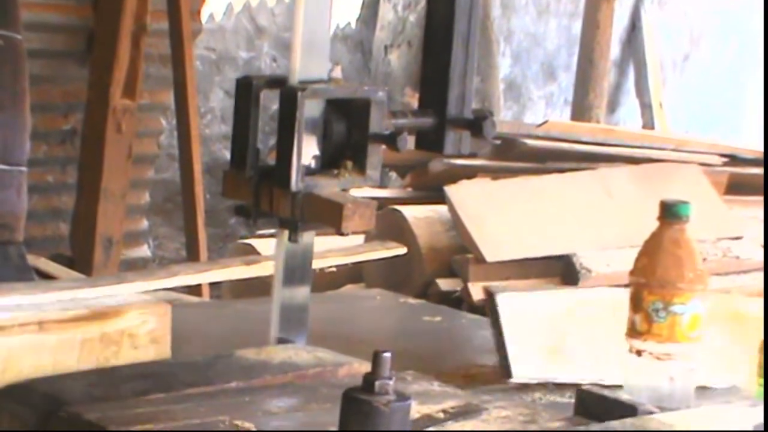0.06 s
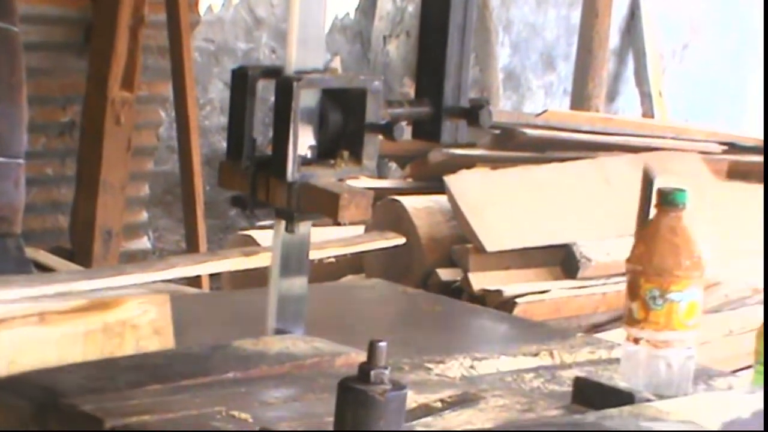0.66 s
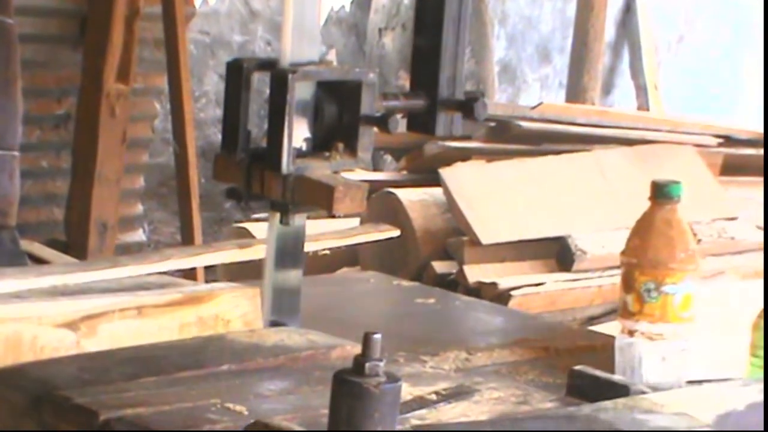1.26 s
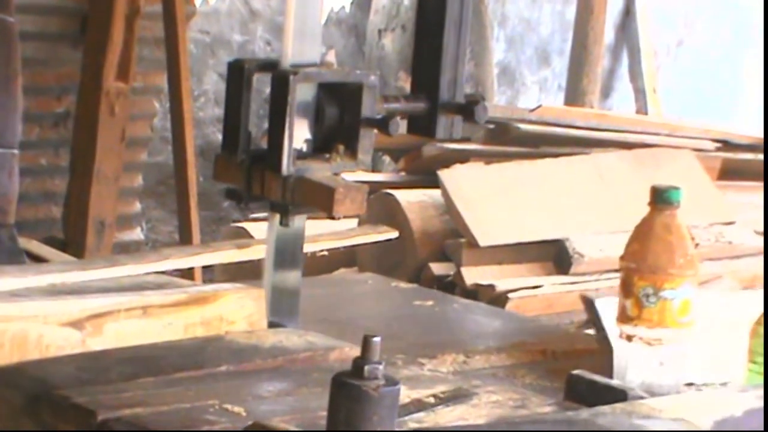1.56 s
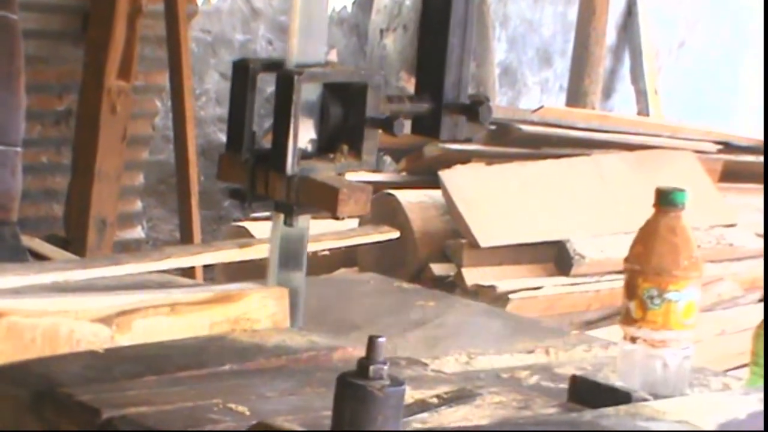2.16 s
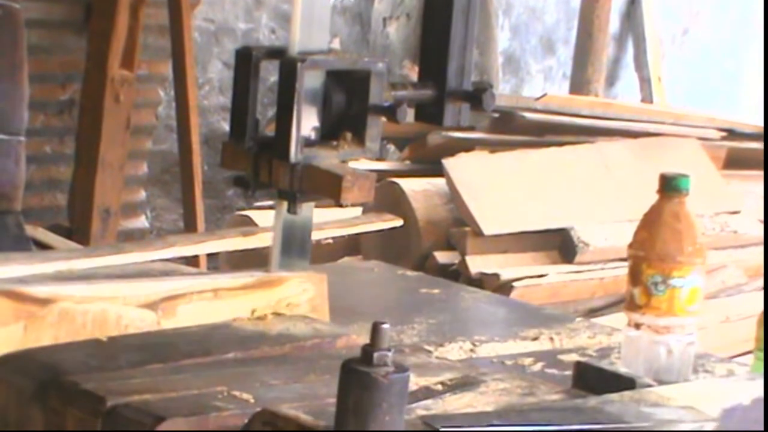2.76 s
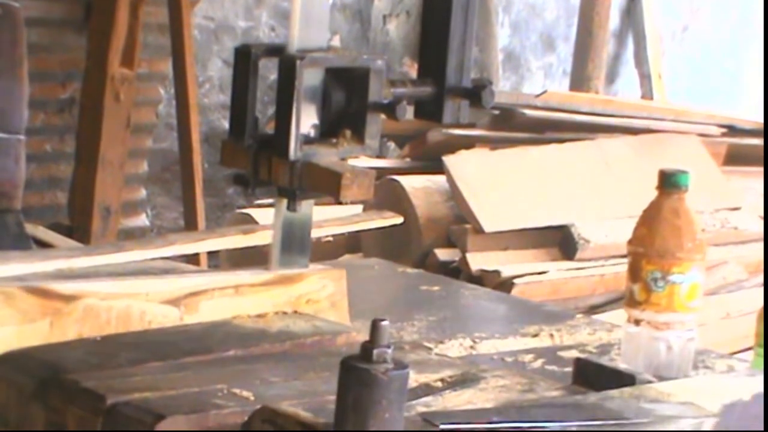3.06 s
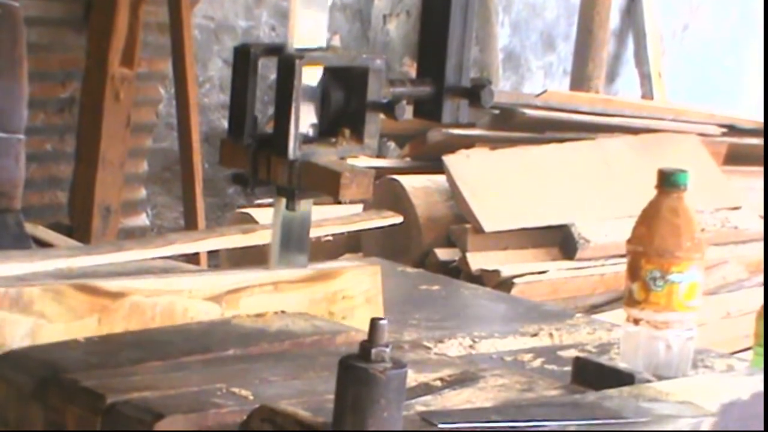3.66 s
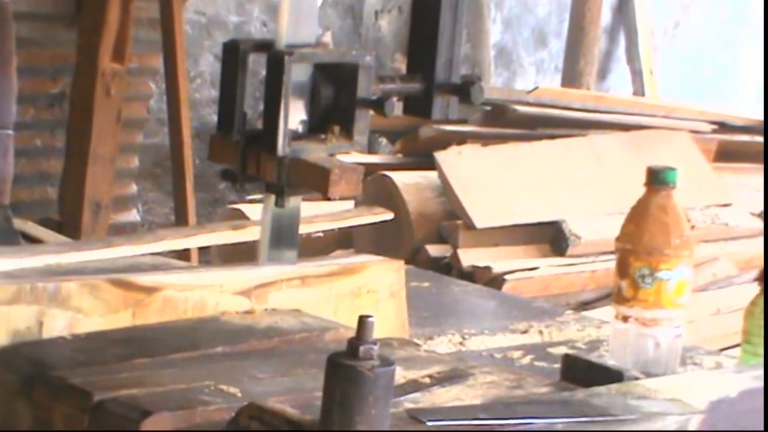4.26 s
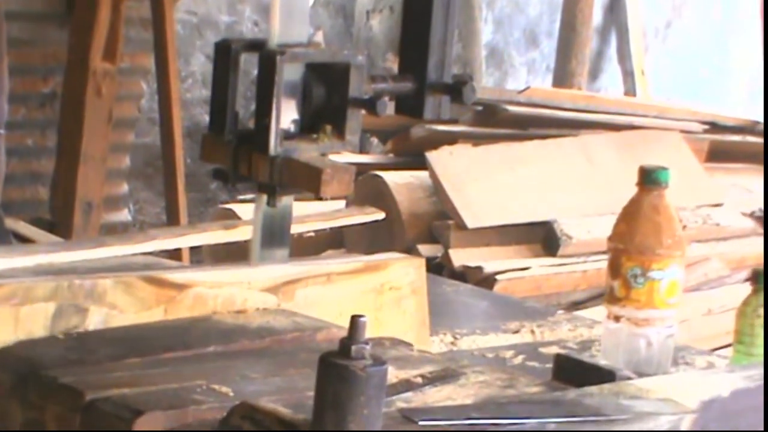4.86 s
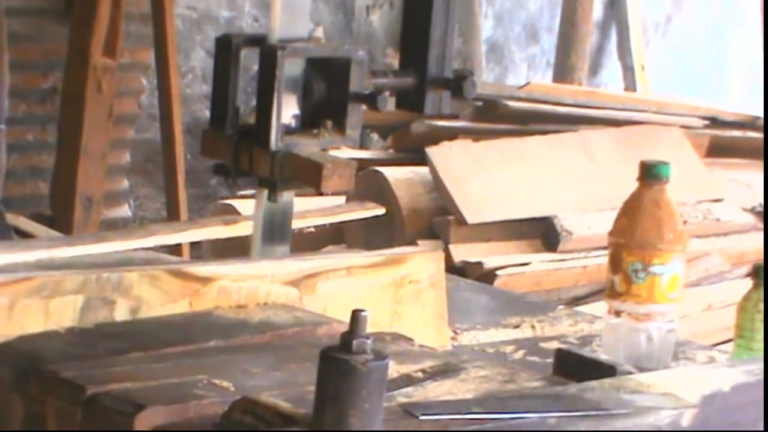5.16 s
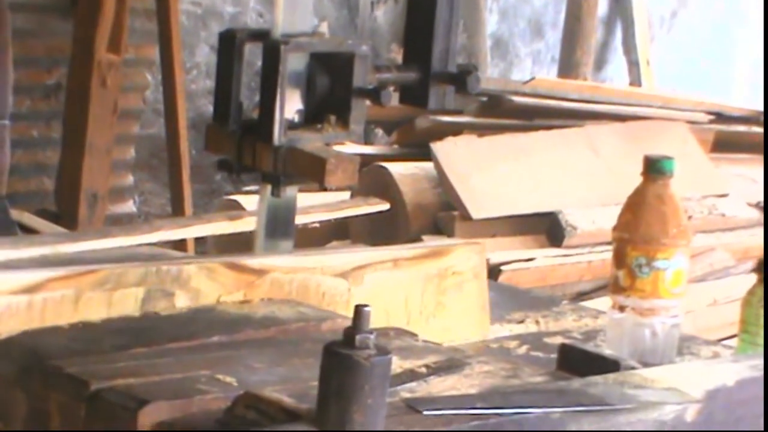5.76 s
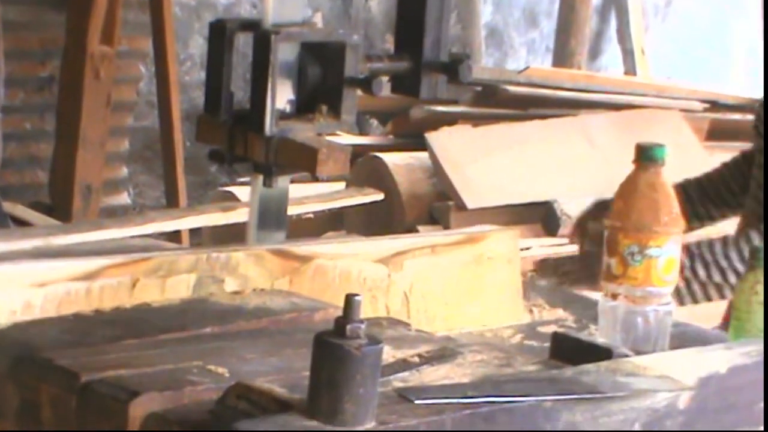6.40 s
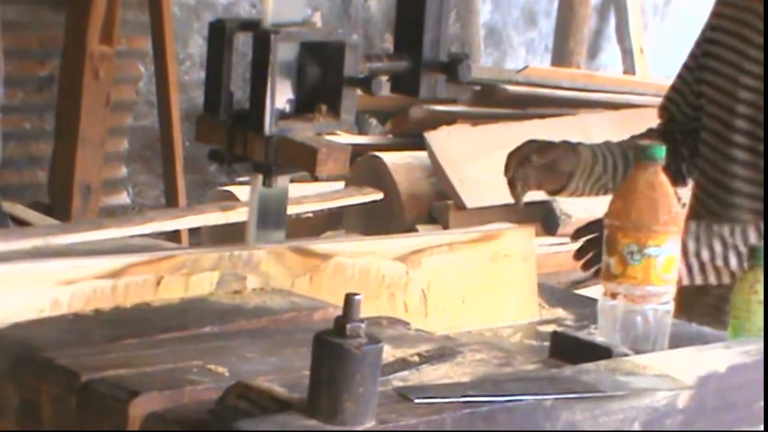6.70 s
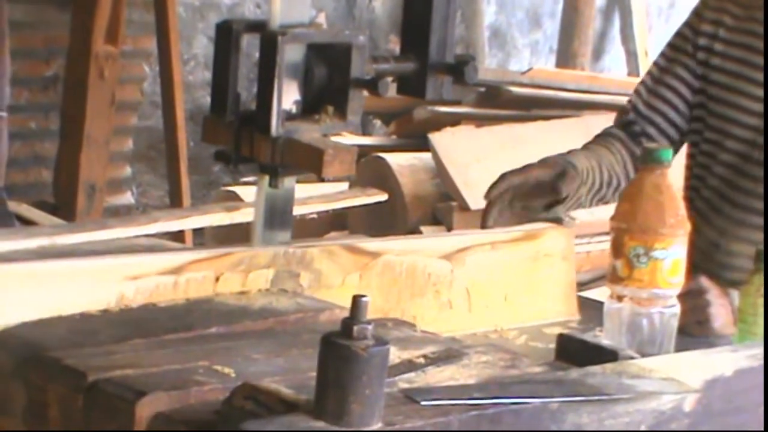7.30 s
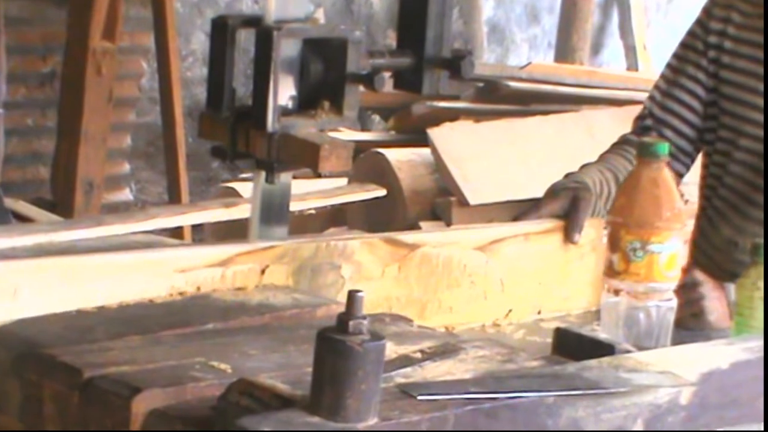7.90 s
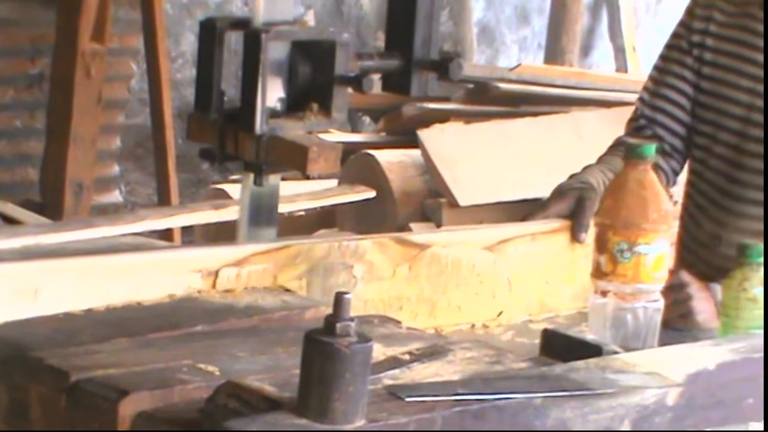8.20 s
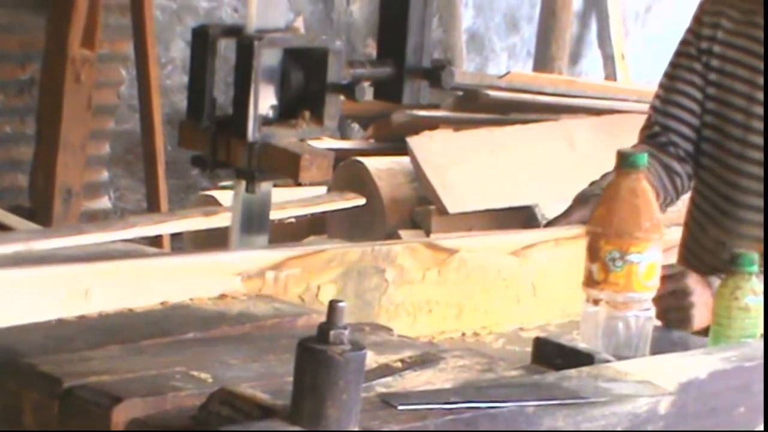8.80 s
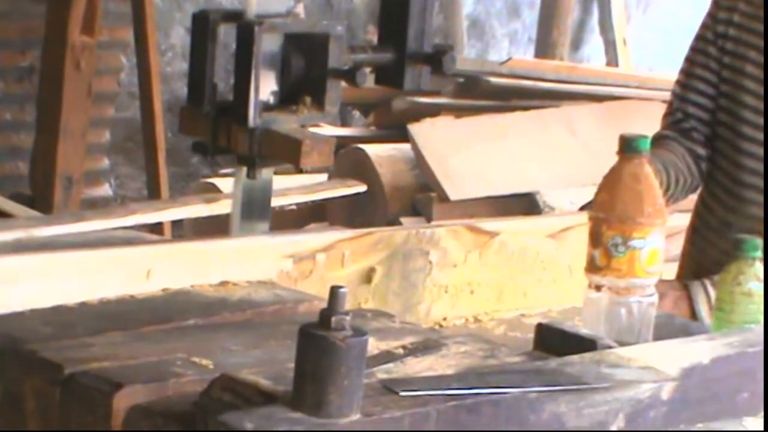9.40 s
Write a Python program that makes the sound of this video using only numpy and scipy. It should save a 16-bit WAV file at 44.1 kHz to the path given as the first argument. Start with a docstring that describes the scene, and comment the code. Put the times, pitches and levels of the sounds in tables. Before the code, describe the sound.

Steady hissing and thin squealing of a band saw blade in wood over a low machine hum, as timber clacks once on the table.

```python
"""Band saw in a small sawmill.

Indoors, on a camera's stereo microphone, the saw a little to the left. A baulk of timber scrapes
along the table into the blade, which hisses and rings in its guides; the drive's whine creeps up
in pitch over the hum of the frame. An offcut thuds on the pile; later the timber clacks on the
table and the camera's gain control ducks."""
import sys
import numpy as np
from scipy import signal
from scipy.fft import rfft, irfft, next_fast_len
from scipy.io import wavfile
from scipy.ndimage import uniform_filter1d, minimum_filter1d, map_coordinates

SR = 44100
rng = np.random.default_rng(int(sys.argv[2]) if len(sys.argv) > 2 else 0)


def generate_wav(signal):
    """Clip the signal to [-1, 1] and save it as 16-bit WAV at the path in sys.argv[1]."""
    frames = np.transpose(np.atleast_2d(signal))
    scaled = np.clip(frames, -1, 1) * 32767
    pcm = np.round(scaled).astype(np.int16)
    wavfile.write(sys.argv[1], SR, pcm)


N = 425565

# the blade in the cut: t/s, rubbing hiss/dB, sawdust fizz/dB, load/dB (heard as low rasp)
CUT_LEVELS = [(0.0, -29, -42, -50), (0.4, -28.0, -46, -51.5), (1.0, -30, -44.5, -51.5),
              (1.2, -28.5, -40.5, -51.5), (1.4, -28, -44, -51.5), (1.6, -28.5, -37.5, -50.5),
              (1.8, -30.5, -38, -53), (2.6, -29.0, -37.0, -45), (3.4, -29.5, -35, -49),
              (4.4, -29.0, -36.0, -46.5), (4.8, -29, -36, -48.5), (6.6, -30.5, -35.5, -48.5),
              (6.8, -29, -39, -49.0), (8.0, -30, -35.5, -47.0), (9.65, -29.5, -34, -48)]


def amp(db):
    """Decibels to gain."""
    return 10 ** (np.asarray(db) / 20)


def unit(x):
    """x at rms 1."""
    return x / np.sqrt(np.mean(np.abs(x) ** 2) + 1e-20)


def along(points, hz):
    """(f/Hz, value) points read on a log axis."""
    f, values = np.transpose(points)
    return np.interp(np.log(hz + 1), np.log(f + 1), values)


def curves(rows):
    """One value per sample for each column after the time."""
    times, *columns = np.transpose(rows)
    return [np.interp(np.arange(N) / SR, times, column) for column in columns]


def above_mean(level_db):
    """A level curve as dB above its own mean."""
    return level_db - level_db.mean()


def wobble(rate):
    """A smooth random curve, rate knots a second."""
    return map_coordinates(rng.standard_normal(int(N * rate / SR) + 4), [np.arange(N) * rate / SR])


def filtered(x, response):
    """x times a response of frequency."""
    size = next_fast_len(N + SR // 4)
    return irfft(rfft(x, size) * response(np.fft.rfftfreq(size, 1 / SR)), size)[..., :N]


def colour(points):
    """The response of a smooth spectrum of (f/Hz, level/dB) points."""
    return lambda hz: amp(along(points, hz))


def resonances(modes):
    """The response of separate (f/Hz, width/Hz, level/dB) modes, steep below and trailing off above."""
    def response(hz):
        power = 0
        for centre, width, db in modes:
            slope = np.where(hz < centre, -3, -1.4)
            power += amp(db) ** 2 * (1 + ((hz - centre) / width) ** 2) ** slope
        return np.sqrt(power)
    return response


def room_noise(response, ripple_db, ripple_hz=16):
    """Stereo noise, mid at rms 1; wall reflections comb it with steady narrow peaks and dips."""
    # stereo width, bass almost mono, wider from 700 Hz up: f/Hz, side against mid/dB
    stereo_width = [(50, -42), (150, -38), (350, -32.5), (700, -12.5), (1400, -9), (2800, -8.5),
                    (5600, -7.9), (10000, -8.5), (14000, -10.5)]

    def heard(hz):
        comb = np.interp(hz / ripple_hz, np.arange(SR // 8), rng.standard_normal(SR // 8))
        mid_side = np.array([np.ones_like(hz), colour(stereo_width)(hz)])
        return response(hz) * amp(ripple_db * comb) * mid_side
    mid, side = filtered(rng.standard_normal((2, N)), heard)
    return np.array([mid + side, mid - side]) / np.std(mid)


def frame():
    """The running machine shakes its frame: a hollow hum over a low rumble."""
    frame_modes = [(80, 16, -13.5), (156, 10.5, 4), (213, 35, -5.5), (298, 14, 1), (324, 8, -15),
                   (392, 22, -8)]  # the frame's resonances: f/Hz, width/Hz, level/dB
    rumble_spectrum = [(20, -25), (55, -25), (80, -3.5), (125, -2), (170, 3.5), (270, 1), (450, -9),
                       (900, -10), (2500, -43)]  # its broad shaking: f/Hz, level/dB
    hum = amp(-57.5) * room_noise(resonances(frame_modes), ripple_db=1.5)
    rumble = amp(-59.5) * room_noise(colour(rumble_spectrum), ripple_db=2.0)
    return hum + rumble


def timber_slide():
    """The timber scrapes dully over the table, fastest while it is shoved up to the blade."""
    push_levels = [(0, -60.5), (1.7, -62), (2.25, -56), (3.7, -57), (4.4, -60.5), (9.65, -64.5)]  # strength of the scrape: t/s, level/dB
    scrape_spectrum = [(120, -31), (280, 4.5), (380, 7), (540, 4.5), (750, -23), (1500, -41)]  # wood on the table: f/Hz, level/dB
    level_db, = curves(push_levels)
    scrape = room_noise(colour(scrape_spectrum), ripple_db=2)
    return amp(level_db + 1.5 * wobble(11)) * scrape


def knocks(blows, modes, scatter_db, room_t60):
    """Each blow rings the same modes; the room scatters them into a short noisy tail."""
    t = np.arange(SR // 2) / SR
    rung = sum(amp(db - 60 * t / t60) * np.sin(2 * np.pi * hz * t) * (-1) ** k
               for k, (hz, db, t60) in enumerate(modes))
    tail_rise = 1 - np.exp(-t / 0.0017)
    direct, tail_power = np.zeros((2, N + SR))
    for start, db in blows:
        span = slice(round(start * SR), round(start * SR) + len(t))
        direct[span] += amp(db) * rung
        tail_power[span] += amp(db - 60 * t / room_t60) ** 2 * tail_rise
    scatter = room_noise(resonances([(hz, hz / 5, db) for hz, db, _ in modes]), ripple_db=2.5)
    return direct[:N] + amp(scatter_db) * np.sqrt(tail_power[:N]) * scatter


def offcut_thud():
    """An offcut lands on the pile and settles, ringing low."""
    landings = [(1.094, -36.5), (1.111, -41)]  # blows on the pile: t/s, level/dB
    offcut_modes = [(125, -17, .15), (204, -1.5, 0.25), (255, -10, .08), (362, -6.5, 0.19), (667, -12, .05),
                    (1210, -15, .04)]  # the wood's ring: f/Hz, level/dB, t60/s
    return knocks(landings, offcut_modes, scatter_db=-1.5, room_t60=0.35)


def timber_clack():
    """The timber hits the saw table and chatters."""
    hits = [(4.0495, -22.5), (4.066, -30), (4.076, -28), (4.086, -30)]  # blows on the table: t/s, level/dB
    table_modes = [(360, -14, .09), (590, -13, .07), (800, -6, .06), (980, -3, .07), (1150, -3, .065),
                   (1560, -3, .045), (2050, -2, .04), (2600, -1, .04), (3100, 0, .04), (3450, -6, .04)]  # the table's ring: f/Hz, level/dB, t60/s
    return knocks(hits, table_modes, scatter_db=-3, room_t60=0.2)


def drive(build_s=0.25):
    """Whines locked to the drive; as its speed creeps up, each order builds in a resonance and fades."""
    turning_rate = [(0, 67.2), (.5, 66.9), (1.1, 66.5), (2, 67.3), (2.5, 68.5), (3, 69.8), (3.5, 70.5),
                    (4.5, 71.25), (5.5, 72.2), (6.5, 73.38), (7.4, 73.3), (8.5, 73.68), (9.65, 74.5)]  # drive speed: t/s, f/Hz
    steady_orders = [(2, -31), (4, -21.5), (7, -19.5), (9, -21.5), (10, -26), (11, -21), (16, -13.5),
                     (18, -10), (20, -21)]  # weak lasting tones: multiple, level against the load/dB
    whines = [(9, 661, 3, -57), (10, 694, 16, -52.5), (10, 733.2, 1.8, -45.5), (10, 737.8, 3.4, -45),
              (11, 739, 3, -52), (17, 1244, 14, -52), (18, 1271, 16, -46), (18, 1320, 5, -48),
              (19, 1343, 12, -49.5), (19, 1392, 4, -51), (23, 1687, 5, -41.5), (27, 1949, 13, -44.5),
              (36, 2652, 7, -47), (37, 2724, 10, -49)]  # orders meeting machine resonances: multiple, f/Hz, half width/Hz, level/dB
    speed, = curves(turning_rate)
    _, _, load_db = curves(CUT_LEVELS)
    angle = 2 * np.pi * np.cumsum(speed + 0.037 * wobble(12)) / SR
    pole = np.exp(-1 / (build_s * SR))
    power = {order: amp(load_db + db + 2.6 * wobble(1.45)) ** 2 for order, db in steady_orders}
    for order, hz, half_hz, db in whines:
        in_tune = np.exp(-((order * speed - hz) / half_hz) ** 2)
        built_up = signal.lfilter([1 - pole], [1, -pole], in_tune)
        power[order] = power.get(order, 0) + (amp(db) * built_up) ** 2
    return sum(np.sqrt(2 * p) * amp(1.9 * wobble(7)) * np.sin(order * angle)
               for order, p in power.items())


def binding(middle_s=7.67, half_length_s=0.28):
    """How tightly the kerf pinches the blade as a hand takes hold of the timber, 0-1."""
    return np.exp(-((np.arange(N) / SR - middle_s) / half_length_s) ** 2)


def rubbed_mode(hz, width_hz, steadiness):
    """One mode kept ringing by friction, which also evens out its swing."""
    band = signal.hilbert(filtered(rng.standard_normal(N), resonances([(hz, width_hz, 0)])))
    swing = np.abs(unit(band))
    return unit(band.real / (swing + 0.086) ** steadiness)


def blade_ring():
    """The taut blade sings in two bending modes; the main one pulses with band and wheel, and squeals."""
    friction_levels = [(0, -41), (1.2, -40.5), (2.2, -40.5), (3.2, -38.5), (5.4, -40), (6.4, -39),
                       (8, -37.5), (9.65, -42)]  # how hard friction drives the main mode: t/s, level/dB
    squeals = [(0.266, 0.059, -35), (0.754, 0.073, -35.5), (1.371, 0.082, -35.5), (3.173, 0.034, -35.5),
               (6.12, 0.036, -32.5), (6.22, 0.036, -31), (6.47, 0.098, -33), (6.948, 0.11, -35.5),
               (7.232, 0.061, -33.5), (7.509, 0.12, -36.5), (7.697, 0.168, -38), (7.922, 0.081, -35.5),
               (8.344, 0.046, -32.5), (8.589, 0.072, -32.5)]  # the main mode flares: t/s, length/s, level/dB
    lap_hz, first_tight_s, wheel_hz = 3.605, 0.046, 14.47
    squeal_edge_db_per_s = 200
    t = np.arange(N) / SR
    friction_db, = curves(friction_levels)
    lap_db = 1.8 * np.cos(2 * np.pi * lap_hz * (t - first_tight_s))  # one tight spot a lap
    main_db = friction_db + lap_db + 2 * binding() + 0.8 * wobble(16)
    for start, length, db in squeals:
        outside_s = np.abs(t - np.clip(t, start, start + length))
        main_db = np.maximum(main_db, db - squeal_edge_db_per_s * outside_s)
    chatter_db = 1.2 * np.cos(2 * np.pi * wheel_hz * t) + 1.7 * wobble(60)
    main = amp(main_db + chatter_db) * rubbed_mode(1689, width_hz=11, steadiness=0.56)
    _, fizz_db, _ = curves(CUT_LEVELS)
    upper_db = -51 + above_mean(fizz_db) + 13 * binding()
    return main + amp(upper_db) * rubbed_mode(2094, width_hz=5.4, steadiness=0.24)


def blade_cut():
    """The running band rubs guides and timber: hiss, steel modes and rasp flutter with its pressure."""
    hiss_spectrum = [(1000, -42), (2200, -30), (3000, -5.5), (4300, -4), (5000, -1), (5700, -4),
                     (6600, -2.5), (8400, -4), (9500, 1.5), (10800, -2.5), (12300, -6.5), (13400, -9.5),
                     (16000, -15)]  # the band rubbing: f/Hz, level/dB
    fizz_spectrum = [(6000, -39), (10500, 7), (12300, 4), (13450, -9), (14400, 2), (16000, -2.5)]  # sawdust spray: f/Hz, level/dB
    top_mode = [(13760, 390, 0)]  # the band's highest mode: f/Hz, width/Hz, level/dB
    steel_modes = [(2180, 13, -5), (2710, 16, -7), (3135, 23, -0.5), (3670, 19, -1), (3828, 30, 0.5),
                   (4140, 19, 0), (4537, 45, 4), (4758, 42, 2.5), (5300, 71, -5), (6310, 160, -5.5),
                   (6840, 18, -3.5), (8720, 170, 5)]  # modes of blade and guides: f/Hz, width/Hz, level/dB
    rasp_spectrum = [(700, -36.5), (1150, -13.5), (1480, -7), (1620, -2.5), (1850, -0.5), (2020, -1.5),
                     (2350, -8), (2800, -6.5), (4000, -13.5), (7000, -39)]  # the wood's rasp: f/Hz, level/dB
    low_spectrum = [(200, -33), (460, -10.5), (620, 1), (800, 2), (1050, 0), (1350, -2), (1900, -11.5),
                    (3500, -37)]  # the low rasp under load: f/Hz, level/dB
    hiss_db, fizz_db, load_db = curves(CUT_LEVELS)
    pressure = amp(0.3 * wobble(14) + 0.47 * wobble(60) + 0.43 * wobble(220))
    hiss = amp(hiss_db - 1.18) * room_noise(colour(hiss_spectrum), ripple_db=2.14)
    fizz = amp(fizz_db - 0.7) * room_noise(colour(fizz_spectrum), ripple_db=0.6)
    sizzle = amp(fizz_db - 3.5 + 1.2 * wobble(22)) * room_noise(resonances(top_mode), ripple_db=5.0)
    damping_db = 0.12 * above_mean(fizz_db)  # the timber closes round the blade
    steel_db = hiss_db - 5.5 - damping_db + 0.93 * wobble(25)
    steel = amp(steel_db) * room_noise(resonances(steel_modes), ripple_db=1.5)
    rasp_db = -34.5 + 0.2 * above_mean(load_db) + 1.5 * binding()
    rasp = amp(rasp_db) * room_noise(colour(rasp_spectrum), ripple_db=3.0)
    low_rasp = amp(load_db + 1.76) * room_noise(colour(low_spectrum), ripple_db=3.5)
    return pressure * (hiss + fizz + sizzle + steel + rasp + low_rasp)


def standing_waves(tone, lead_radians):
    """Standing waves in the room put the two microphone ports a little out of phase."""
    return filtered(tone, lambda hz: np.exp(0.5j * lead_radians * np.array([[1], [-1]])))


def scene():
    """The mill at the microphone, with the saw standing a little to the left."""
    balance = [(100, -0.5), (200, 1.3), (700, 0.5), (5500, .6), (10000, 0), (15000, 0)]  # the lean of the stereo image: f/Hz, left minus right/dB
    blows = offcut_thud() + timber_clack()
    tones = standing_waves(blade_ring() + drive(), lead_radians=0.3)
    mix = blade_cut() + tones + frame() + timber_slide() + blows
    return filtered(mix, lambda hz: amp(along(balance, hz) * np.array([[0.5], [-0.5]])))


def gain_control(x, threshold_db, most_db, ahead_s, fast_db_per_s, slow_db_per_s, slow_share):
    """Ducks just ahead of a loud knock, gives part of the gain back quickly and the rest slowly."""
    t = np.arange(N) / SR

    def detector_band(hz):  # deaf to hiss and rumble
        return 1 / (1 + (hz / 1300) ** 8) / (1 + (500 / (hz + 1)) ** 8)

    def release(cut, db_per_s):
        return np.maximum.accumulate(cut + db_per_s * t) - db_per_s * t
    sensed = filtered(x.mean(axis=0), detector_band)
    power = np.abs(uniform_filter1d(sensed ** 2, size=220))
    wanted_db = np.clip(4 * (10 * np.log10(power + 1e-12) - threshold_db), 0, most_db)
    early_db = np.interp(t + ahead_s, t, wanted_db)
    held_db = -minimum_filter1d(-early_db, size=1800, origin=899)  # peaks hold for 41 ms
    cut_db = np.maximum(release(held_db, fast_db_per_s), release(slow_share * held_db, slow_db_per_s))
    return x * amp(-uniform_filter1d(cut_db, size=180))


def record(dry):
    """The camera's gain control and band limit."""
    ducked = gain_control(dry, threshold_db=-30.5, most_db=7.8, ahead_s=0.027,
                          fast_db_per_s=45, slow_db_per_s=2.9, slow_share=0.72)
    return filtered(ducked, lambda hz: hz < 15730)


dry = scene()
out = record(dry)
generate_wav(out)
```